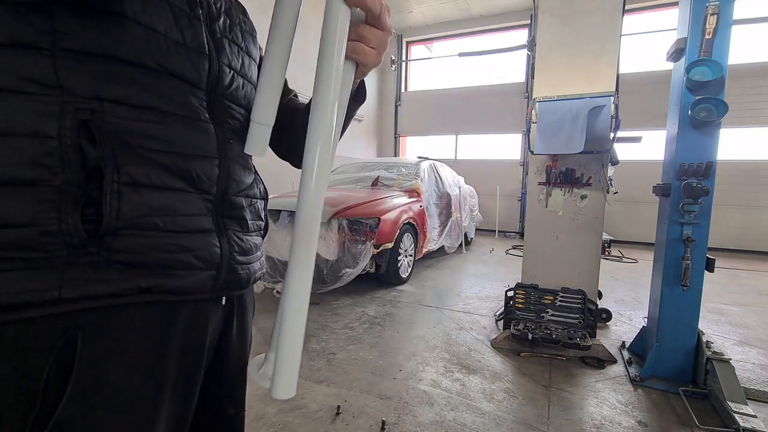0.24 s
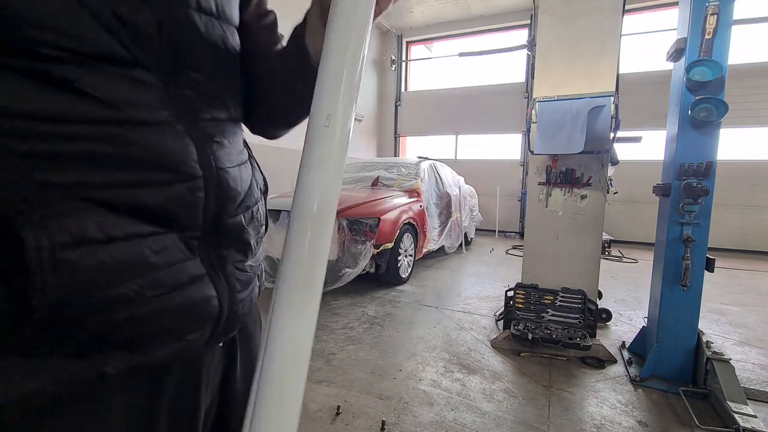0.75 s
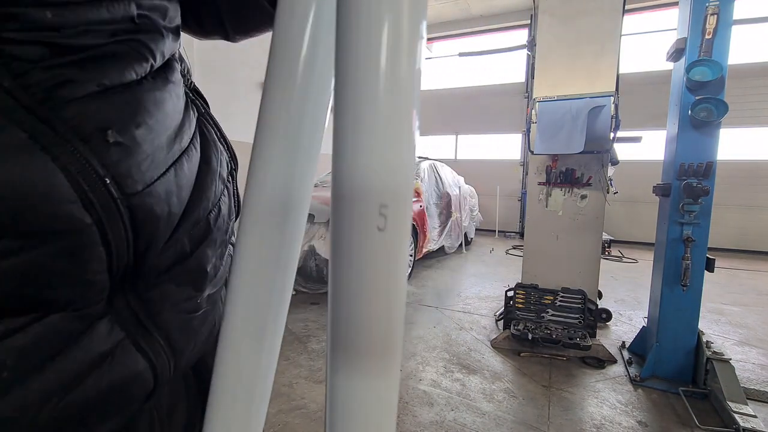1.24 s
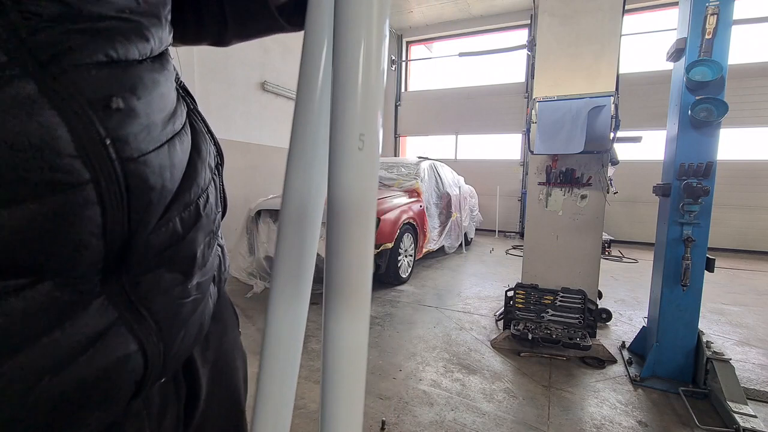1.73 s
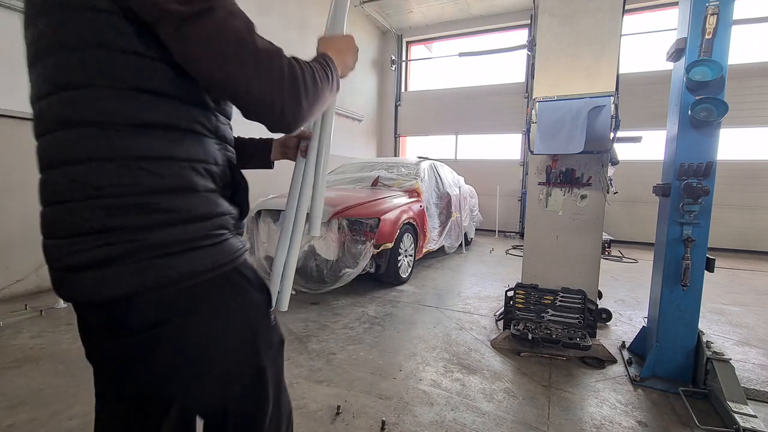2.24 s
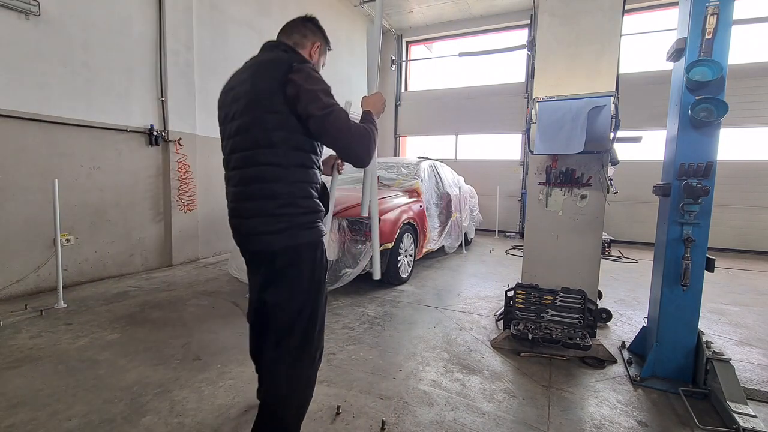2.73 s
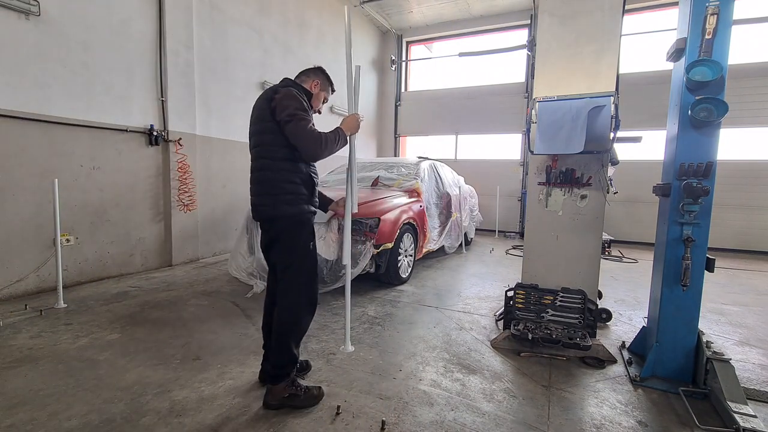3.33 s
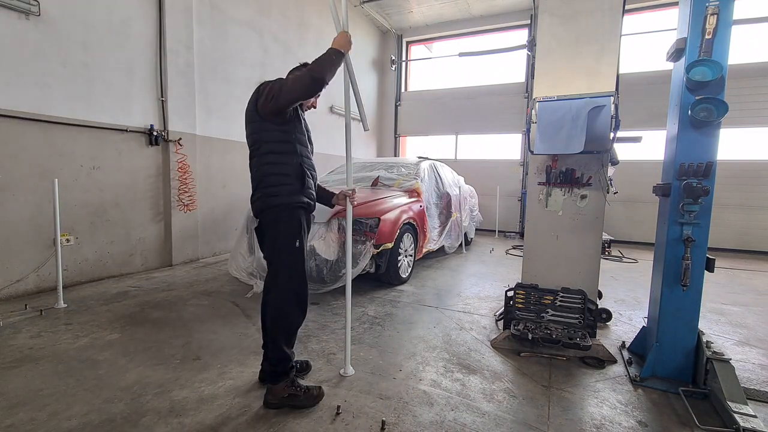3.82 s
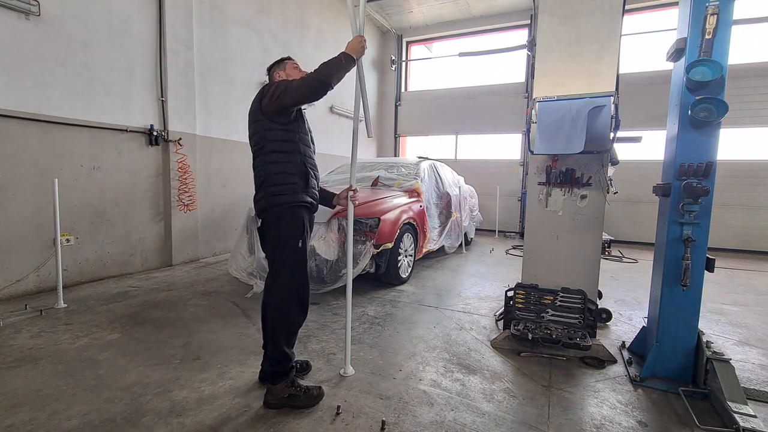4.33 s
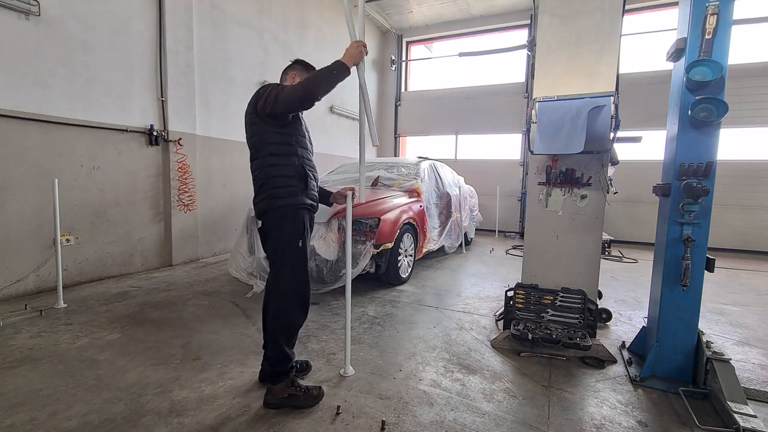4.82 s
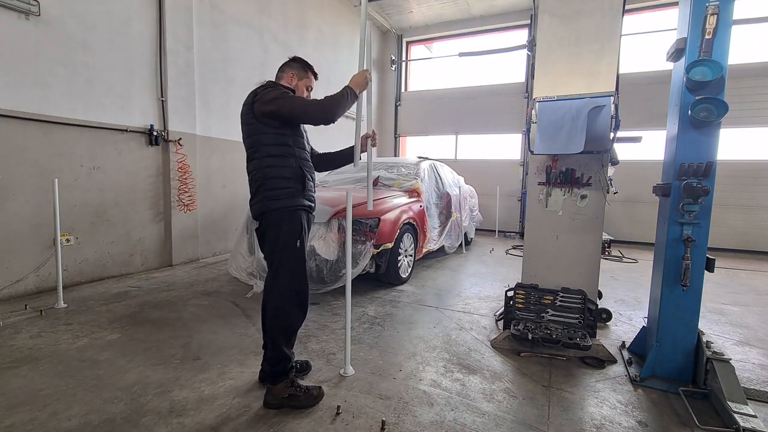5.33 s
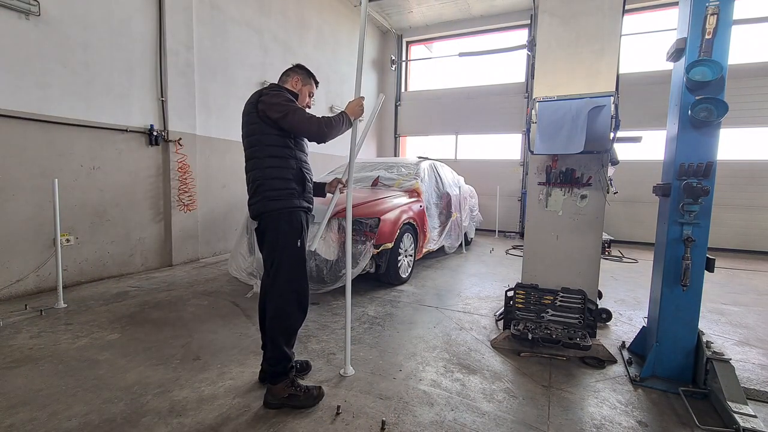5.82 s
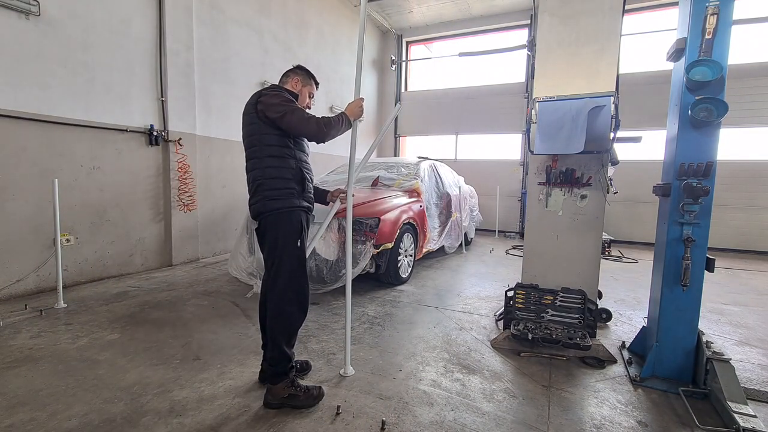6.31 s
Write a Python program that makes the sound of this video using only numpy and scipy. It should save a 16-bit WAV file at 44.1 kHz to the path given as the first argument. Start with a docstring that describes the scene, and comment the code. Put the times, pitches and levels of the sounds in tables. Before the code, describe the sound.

A bare, hard-walled garage with quiet air, a steady thin hiss on the left, a soft fading low drone and a lumpy rumble. From 0.2 to 0.8 s a faint low hum, with barely audible clothing rub; a soft rustle starts near 1.4 s. At 1.73 s a loud hollow thunk of steel tubes, close and mostly dry, low-mid pitched, rings briefly. A stronger, wavering deep hum runs from 1.65 to 2.9 s. Light ringing taps come at 2.5 s. A small touch at 3.3 s leads to a loud bright clank at 3.5 s, rattling until 3.7 s with a clear echo. Short scuffs at 3.9 and 4.8 s, a light ringing tap at 5.3 s, then faint hum from 5.9 s and tiny scuffs near 6.35 s. Poles sound duller on the right.

```python
"""Steel tent poles are handled in a bare, echoing garage: one hollow thunk close by, a bright clank and
rattle as two tubes slide home, and light ringing taps before and after the clank. Shoes scuff and a
jacket rustles faintly. Contacts are damped noise bursts with an echo tail, plus fluttering decaying tube
modes; scuffs are noise swells. Under them lie shaped noise (a steady hiss on the left, air, a fading
drone, an uneven rumble) and a low sine hum that comes and goes; poles and scuffs are duller on the right."""
import sys
import numpy as np
from scipy import signal
from scipy.fft import rfft, irfft, next_fast_len
from scipy.io import wavfile
from scipy.ndimage import map_coordinates

SR = 44100
rng = np.random.default_rng(int(sys.argv[2]) if len(sys.argv) > 2 else 0)


def bounce(signal):
    """Save signal as a 16-bit WAV file at the path given by the first command-line argument."""
    frames = np.transpose(np.atleast_2d(signal))
    limited = np.clip(frames, -1, 1)
    pcm = np.round(limited * 32767).astype(np.int16)
    wavfile.write(sys.argv[1], SR, pcm)


N = 289729  # length in samples


def amp(db):
    """Decibels to gain."""
    return 10 ** (np.asarray(db) / 20)


def unit(x):
    """Scale to rms 1."""
    return x / np.sqrt(np.mean(x ** 2) + 1e-20)


def along(points, hz):
    """Read a curve of (Hz, value) points on a log frequency axis."""
    point_hz, value = np.transpose(points)
    return np.interp(np.log(hz + 1), np.log(point_hz + 1), value)


def filtered(x, response):
    """Multiply the spectrum of x by a response of frequency, with padding against wrap-around."""
    n = x.shape[-1]
    padded = next_fast_len(n + 8192)
    spectrum = rfft(x, padded) * response(np.fft.rfftfreq(padded, 1 / SR))
    return irfft(spectrum, padded)[..., :n]


def noise(colour, size):
    """Coloured noise of rms 1."""
    return unit(filtered(rng.standard_normal(size), lambda hz: amp(along(colour, hz))))


def tilted(x, slope_db):
    """Harder contacts are brighter: a slope per octave about 1500 Hz, flat outside 300 to 8000 Hz."""
    return filtered(x, lambda hz: amp(slope_db * np.log2(np.clip(hz, 300, 8000) / 1500)))


def add(track, s, x):
    """Mix x into the track at time s."""
    part = track[round(s * SR):][:len(x)]
    part += x[:len(part)]


def held(s, length_s, attack_s, release_s):
    """An envelope that rises at s, holds and dies away after its length."""
    t = np.arange(N) / SR - s
    return np.clip(t / attack_s, 0, 1) * np.clip(1 - (t - length_s) / release_s, 0, 1)


def garage(x, wet_db, lag_s, build_s):
    """Direct sound (the right side lag_s late) plus a diffuse tail that builds up and dies by frequency."""
    # decay time of the bare room: hz, t60_s
    room_decay = [(100, 1), (400, 0.83), (1000, 1), (2500, 0.73), (5000, 0.55), (8000, 0.18), (14000, .24)]
    hz, t, grains = signal.stft(rng.standard_normal((2, SR)), SR, nperseg=256)
    decay = amp(-60 * t / along(room_decay, hz)[:, None])
    build_up = 1 - np.exp(-t / build_s)
    tail = signal.istft(grains * decay * build_up, SR, nperseg=256)[1]
    tail = tail / np.linalg.norm(tail[0])
    echo = signal.fftconvolve(x[None], tail, axes=1)[:, :N]
    direct = np.array([x, np.roll(x, round(lag_s * SR))])
    return direct + amp(wet_db) * echo


def background(air_db, hiss_db, hiss_right_db):
    """The room's air, a soft drone that slowly fades, and a hiss that sits on the left."""
    # colours of the room's air, the drone and the hiss, relative: hz, level_db per Hz
    air_colour = [(60, -2), (200, -9), (340, -13), (670, -11), (800, -28.5), (1150, -11), (1500, -29.5),
                  (2500, -36), (4000, -41), (6000, -47.5)]
    drone_colour = [(60, -28.5), (140, -3.5), (230, 3), (300, -9), (600, -45)]
    hiss_colour = [(200, -6), (550, -4), (780, -8), (1100, 4), (1550, -7), (2400, -3.5), (2950, 1.5),
                   (3400, 3), (4100, -6), (4800, -2), (5300, -14), (5800, -45), (10000, -44), (11600, -33),
                   (15500, -38)]
    drone_db, fade_db_per_s = -55.5, 1.5
    drone = amp(drone_db - fade_db_per_s * np.arange(N) / SR) * noise(drone_colour, (2, N))
    hiss = amp(hiss_db) * noise(hiss_colour, (2, N)) * amp([[0], [hiss_right_db]])
    return amp(air_db) * noise(air_colour, (2, N)) + drone + hiss


def rumble(hum_strength, apart_db, lumps_db):
    """A lumpy low rumble, partly shared by both sides, grows with the hum and rises in soft bumps."""
    # soft low bumps while the poles are moved about: start_s, length_s, level_db before the lumps
    bumps = [(0.95, .015, -39.5), (3.265, 0.2, -42), (3.612, 0.04, -49), (3.853, .31, -47),
             (4.647, 0.246, -45.5), (5.008, 0.12, -47), (5.24, 0.026, -53), (5.564, 0.071, -50)]
    # colour of the rumble, relative: hz, level_db per Hz
    low_colour = [(15, -6.5), (33, -6.5), (50, -3), (78, 0), (105, -10), (200, -22), (400, -29),
                  (1000, -74.5)]
    floor_db = -51
    with_hum_db, grows = -24, 0.56  # level under a full-scale hum; its dB per dB of hum
    power = amp(floor_db) ** 2 + (amp(with_hum_db) * hum_strength ** grows) ** 2
    for s, length_s, level_db in bumps:
        bump = amp(level_db) * held(s, length_s, attack_s=0.012, release_s=0.038)
        power = power + bump ** 2
    # a smooth random curve with 14 knots a second
    lumps = map_coordinates(rng.standard_normal(N // 100), [np.arange(N) * 14 / SR])
    shared = noise(low_colour, N)
    low = unit(shared + amp(apart_db) * noise(low_colour, (2, N)))
    return low * np.sqrt(power) * amp(lumps_db * lumps)


def hum():
    """A nearly pure low tone starts and stops, each time at another pitch; returns the tone and its strength."""
    # three hums: start_s, length_s, pitch_hz, glide_hz_per_s, rms level_db, delay_s to the right side
    hums = [(.19, 0.636, 65.7, -6, -38, 0), (1.641, 1.29, 76.04, -0.3, -29.5, .0027),
            (5.88, 0.57, 53.34, 2, -48.5, -0.00087)]
    # the longest hum wavers about its level: time_s, level_db
    waver_points = [(1.64, -6.5), (1.83, -2.5), (2.03, -4.5), (2.2, 0.5), (2.37, -3.5), (2.55, 2.5),
                    (2.72, 3.5), (2.93, -6.5)]
    tone, strength, t = np.zeros((2, N)), np.zeros(N), np.arange(N) / SR
    waver = amp(np.interp(t, *np.transpose(waver_points)))
    longest_s = max(row[1] for row in hums)
    for s, length_s, start_hz, glide, level_db, lag_s in hums:
        level = amp(level_db) * held(s, length_s, attack_s=0.022, release_s=0.044)
        if length_s == longest_s:
            level = level * waver
        age = np.array([t, t - lag_s]) - s
        cycles = (start_hz + glide * age / 2) * age
        tone += level * np.sqrt(2) * np.sin(2 * np.pi * cycles)
        strength += level
    return tone, strength


def scuffs():
    """Soles and sleeves rub in brief soft swells of noise."""
    # shoes and clothing: start_s, relative level_db, length_s (peak at a third), bright_db_per_octave
    rubs = [(0.197, -59, 0.28, -2), (0.553, -64, 0.52, -1.5), (0.634, -62, 0.015, 15),
            (0.926, -58, 0.018, 8), (1.364, -54, 0.92, 1), (3.078, -61, 0.038, 15), (3.266, -51, 0.025, 0),
            (3.931, -45, 0.047, 5), (4.33, -68.5, 0.026, 9.5), (4.78, -54, 0.17, 4),
            (5.916, -67.5, 0.072, -5.5), (6.332, -55, 0.037, 4), (6.382, -60.5, 0.043, -3)]
    # colour of the rubbing before its tilt, relative: hz, level_db per Hz
    rub_colour = [(100, -17.5), (500, 14.5), (900, 2), (2400, -10), (4500, -15), (8000, -49.5),
                  (15000, -54)]
    track, t = np.zeros(N), np.arange(SR // 2) / SR  # each swell is cut off after half a second
    for s, level_db, length_s, bright_db in rubs:
        u = 3 * t / length_s
        swell = u * np.exp(1 - u)
        add(track, s, amp(level_db) * swell * tilted(noise(rub_colour, len(t)), bright_db))
    return garage(track, wet_db=-4.5, lag_s=0, build_s=0.0068)


def clatter(contacts, colour, level_db, t60_s, attack_s):
    """Each contact gives a short burst of dense, quickly damped vibration."""
    track, t = np.zeros(N), np.arange(SR // 5) / SR
    for s, contact_db, _, bright_db in contacts:
        burst = tilted(noise(colour, len(t)), bright_db)
        fade = amp(contact_db + level_db - 60 * t / t60_s) * (1 - np.exp(-t / attack_s))
        add(track, s, fade * burst)
    return track


def ringing(contacts, modes, level_db, flutter_hz, attack_s):
    """Every contact feeds energy to the tube's modes; split modes and wall echoes make each one flutter."""
    track, t = np.zeros((2, N)), np.arange(N) / SR
    knots = np.arange(0, N / SR, 1 / flutter_hz)
    ring_t = t[:SR]  # each contact rings for one second at most
    for hz, mode_db, t60_s in modes:
        energy = np.zeros(N)
        fade = amp(-60 * ring_t / t60_s) * (1 - np.exp(-ring_t / attack_s))
        for s, contact_db, ring_db, bright_db in contacts:
            hardness_db = bright_db * np.log2(hz / 1500) / 2  # hard contacts favour the upper modes
            start_db = contact_db + ring_db + hardness_db + mode_db + level_db
            add(energy, s, (amp(start_db) * fade) ** 2)
        live = np.flatnonzero(energy)
        phase = rng.random()  # in cycles, shared by both sides
        for side in track:
            wander = rng.standard_normal(len(knots)) + 1j * rng.standard_normal(len(knots))
            flutter = np.interp(t[live], knots, 1 + 0.35 * wander)
            carrier = np.exp(2j * np.pi * (hz * t[live] + phase + rng.random() / np.pi))
            side[live] += np.sqrt(energy[live]) * np.real(flutter * carrier)
    return track


def thump(contacts, pitch_hz, t60_s, level_db):
    """The heavy contacts of the thunk push out a few strong cycles, quickly damped by the hand."""
    track, t = np.zeros(N), np.arange(SR // 4) / SR
    cycles = (1 - np.exp(-t / 0.002)) * np.sin(2 * np.pi * pitch_hz * t)
    for s, contact_db, ring_db, _ in contacts:
        add(track, s, amp(contact_db + ring_db + level_db - 60 * t / t60_s) * cycles)
    return track


def taps():
    """Light taps of tube on tube: short clatter, ringing modes and one mode slow to swell in the room."""
    # taps before and after the clank: start_s, relative level_db, ring_db against that, bright_db_per_octave
    touches = [(2.473, -35.5, -5.5, -1), (2.534, -41, 0, 1), (5.287, -39, 3, -0.5), (5.308, -50.5, -5, 1.5),
               (5.345, -57.5, 0, -1)]
    # dense clatter before its tilt, relative: hz, level_db per Hz
    crack = [(100, -59), (520, 9.5), (850, -2), (1600, 2), (2200, -0.5), (2700, 1.5), (4500, -3),
             (6500, -4.5), (8000, -22), (15000, -19.5)]
    # tube modes as they ring in the room, then the slow one: hz, relative level_db, t60_s
    modes = [(558, -2, 0.2), (612, -4, 0.24), (1060, -2.5, 0.68), (2427, -0.5, 0.83), (2443, 0.5, 0.79),
             (2930, -11, 0.54), (4370, -12, .45), (6200, -7, 0.2), (9100, -36, .35)]
    slow_mode = [(1683, 8, 0.57)]
    dense = clatter(touches, crack, level_db=6.5, t60_s=0.088, attack_s=0.0024)
    sound = garage(dense, wet_db=-0.5, lag_s=-0.0023, build_s=0.0052)
    sound += ringing(touches, modes, level_db=-4.5, flutter_hz=34.5, attack_s=0.002)
    sound += ringing(touches, slow_mode, level_db=-5, flutter_hz=34.4, attack_s=0.083)
    return sound


def clank():
    """Tubes touch, slide home and rattle: bright clatter with a strong echo, over ringing tube modes."""
    # the contacts: start_s, relative level_db, ring_db against that, bright_db_per_octave
    knocks = [(3.289, -36, -5.5, -2.5), (3.4965, -48.5, -15, 16), (3.5003, -9, -3.5, 1.5),
              (3.504, -10.5, -24, -5.5), (3.513, -36.5, -9, 11), (3.529, -34.5, -14, 1.5),
              (3.607, -16.5, -11, 4), (3.642, -24, -16, 5), (3.717, -37.5, 10.5, 2)]
    # dense clatter before its tilt, relative: hz, level_db per Hz
    crack = [(60, -23.5), (180, -21), (300, -26.5), (480, -8), (820, -5.5), (1100, -8.5), (1400, -2.5),
             (1750, -6.5), (2400, 5.5), (2800, 0.5), (3500, 1), (4200, -8.5), (5000, -5.5), (7000, -18.5),
             (8200, -29.5), (15000, -33)]
    # tube modes as they ring in the room: hz, relative level_db, t60_s
    modes = [(479, -3, .4), (655, -7, .55), (931, 4, .55), (1281, -8, .3), (1480, -6, .3), (2279, -1, .5),
             (2363, -4, .6), (2436, 1, .6), (2514, 2, .55), (2638, -4, .5), (2837, -6, .6), (3490, -4, .4),
             (3700, -5, .45), (4942, -7, .5)]
    dense = clatter(knocks, crack, level_db=2.06, t60_s=0.034, attack_s=0.0012)
    sound = garage(dense, wet_db=-0.5, lag_s=-0.0012, build_s=0.01)
    sound += ringing(knocks, modes, level_db=-18.0, flutter_hz=39.56, attack_s=0.00058)
    return sound


def thunk():
    """The hollow thunk close by: mostly direct clatter, a few strong low cycles and ringing tube modes."""
    # the contacts: start_s, relative level_db, ring_db against that, bright_db_per_octave
    knocks = [(1.7264, -7.5, -16, 0.5), (1.73, -10.5, 1.5, -5.5), (1.7443, -16, 3, -8)]
    # dense clatter before its tilt, relative: hz, level_db per Hz
    crack = [(60, -35.5), (170, -34), (320, -5), (560, -7.5), (710, 0.5), (900, -18), (1220, -5),
             (1600, -23), (2400, -16), (3100, -15.5), (4300, -27), (5400, -18), (6200, -29.5),
             (7800, -49.5), (15000, -47)]
    # tube modes as they ring in the room: hz, relative level_db, t60_s
    modes = [(326, -1.5, 0.28), (370, -4.5, 0.61), (405.5, -3, 0.29), (476, -8, .3), (522, -13.5, .3),
             (633, -8.5, 0.65), (649, -4.5, 0.55), (728, -4, 0.49), (806, -11, 0.32), (1155, -11, 0.76),
             (1227, -2.5, 0.54), (2455, -11.5, 0.34), (3230, -19, 0.11), (5500, -20, .11)]
    dense = clatter(knocks, crack, level_db=3.0, t60_s=0.034, attack_s=0.0011)
    sound = garage(dense, wet_db=-10, lag_s=0.00058, build_s=0.0018)
    push = thump(knocks, pitch_hz=350, t60_s=0.04, level_db=8)
    sound += garage(push, wet_db=-17, lag_s=0.0005, build_s=0.008)
    sound += ringing(knocks, modes, level_db=-14, flutter_hz=40.1, attack_s=0.0014)
    return sound


def scene():
    """Poles and footwork, duller on the right, over hum, rumble and background."""
    # right side against left: hz, level_db
    shade = [(100, -10.5), (500, -2), (1000, -7), (2000, -9), (3300, -17.5), (5000, -23.5), (7000, -43),
             (10000, -14), (14000, -8)]
    left, right = thunk() + clank() + taps() + scuffs()
    right = filtered(right, lambda hz: amp(along(shade, hz)))
    tone, strength = hum()
    low = tone + rumble(strength, apart_db=7.5, lumps_db=4)
    return np.array([left, right]) + low + background(air_db=-59.5, hiss_db=-47.0, hiss_right_db=-43.5)


def record(dry):
    """The loudest peaks are rounded off towards 0.9; nothing is kept above the band limit."""
    top_hz = 15820
    rounded = dry / (1 + np.abs(dry / 0.9) ** 8) ** (1 / 8)
    return filtered(rounded, lambda hz: hz < top_hz)


dry = scene()
out = record(dry)
bounce(out)
```